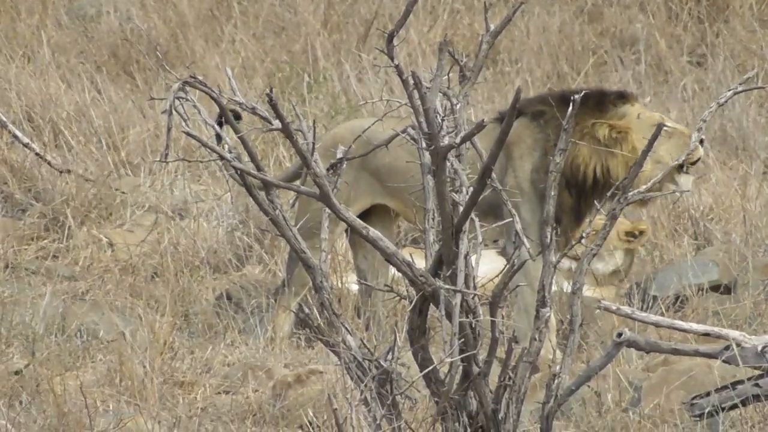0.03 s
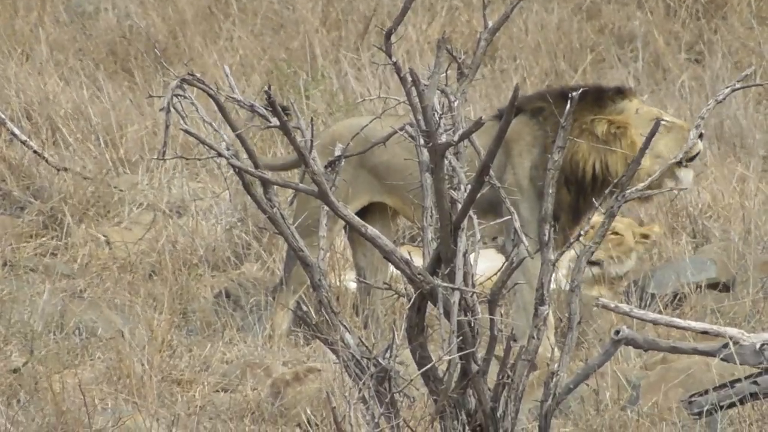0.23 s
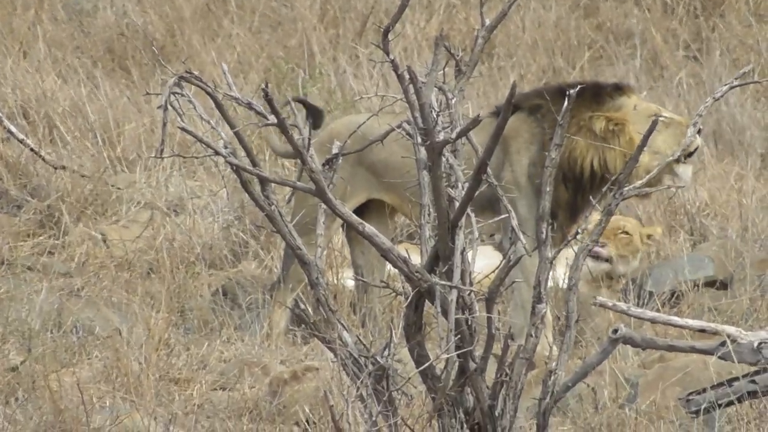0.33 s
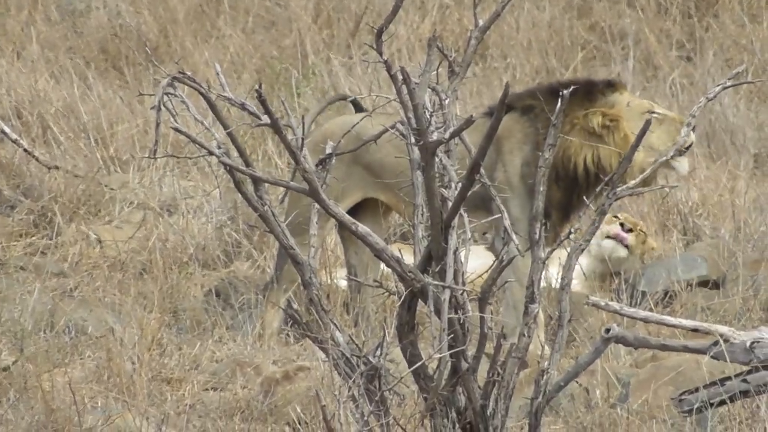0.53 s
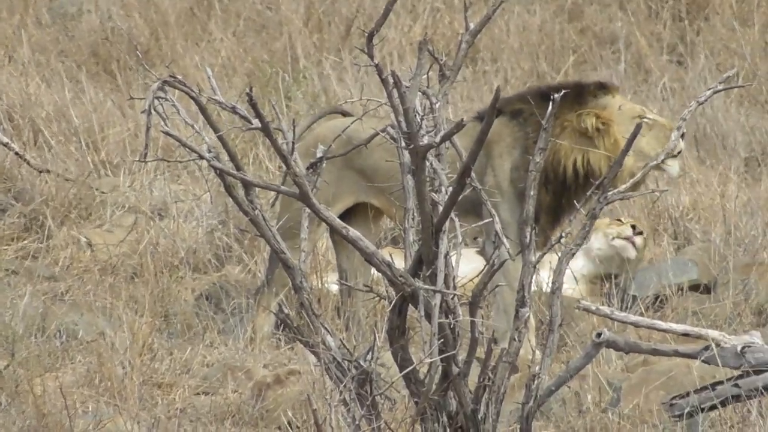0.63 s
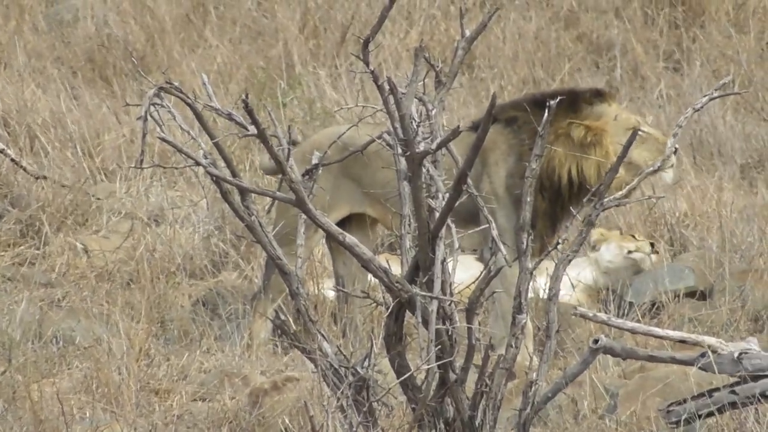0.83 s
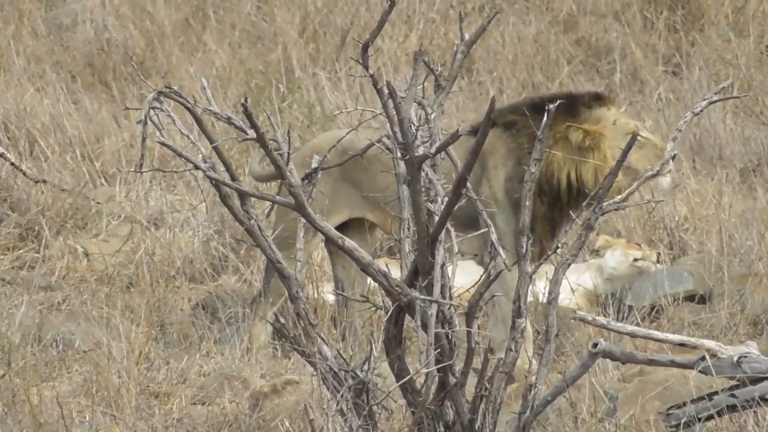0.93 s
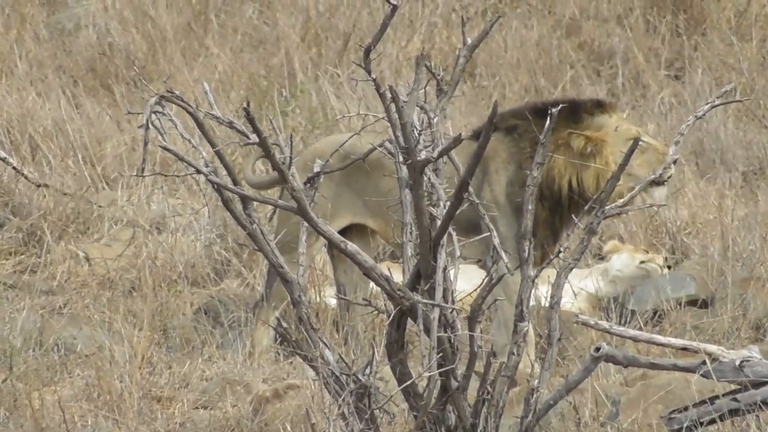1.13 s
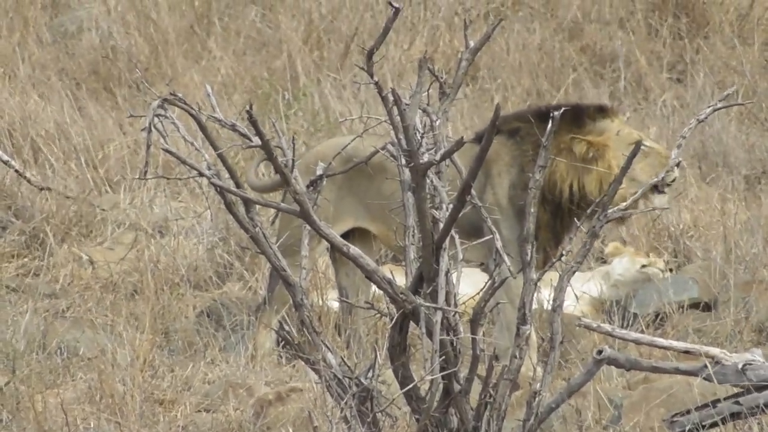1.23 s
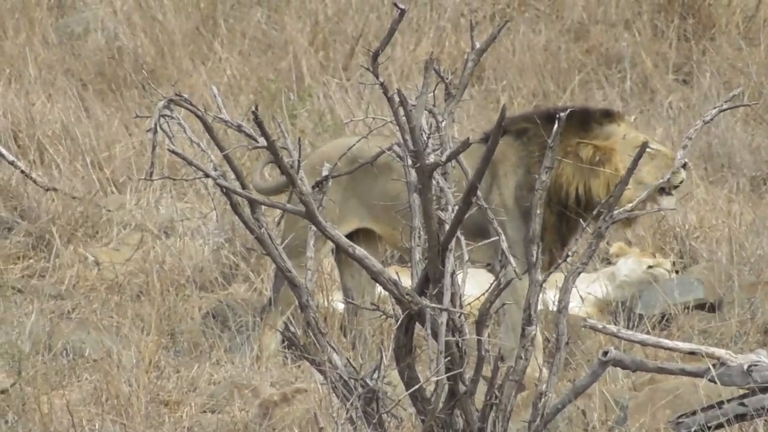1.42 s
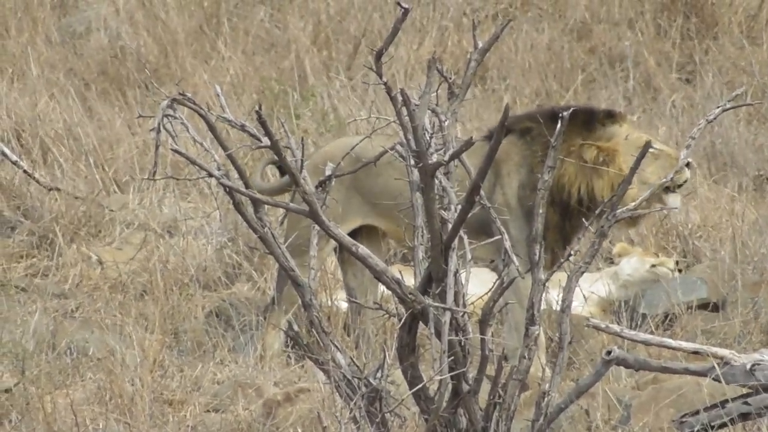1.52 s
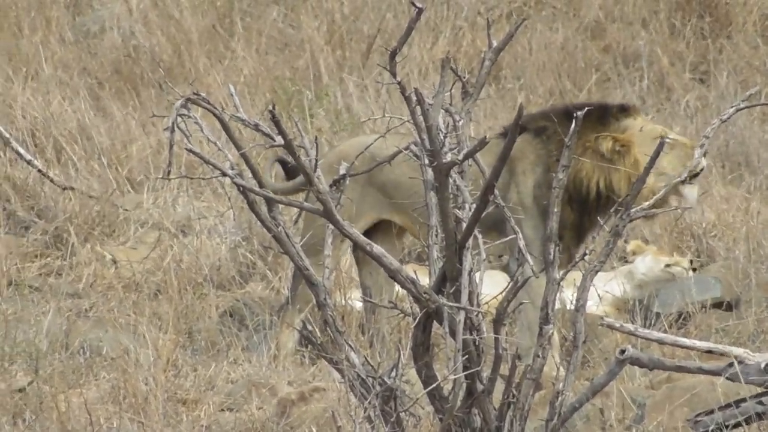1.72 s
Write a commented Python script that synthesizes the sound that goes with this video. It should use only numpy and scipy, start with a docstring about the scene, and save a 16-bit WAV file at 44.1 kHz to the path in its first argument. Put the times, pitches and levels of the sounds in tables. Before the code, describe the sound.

Low lion moan swells and sinks into a puff of air, then a dull thump over light wind.

```python
"""Open dry bush, where a lion gives one soft, drawn-out moan that ends in a puff of air.
A strong low tone rises and sinks in pitch, with faint throat-coloured overtones and pulsing rasp.
The bush returns a weak echo, made by convolving the lion with decaying noise.
Shaped noise gives light wind, low buffets and hiss throughout.
Late on, one dull thump jolts the microphone: push-pull pulses inside a short rush of air."""
import sys
import numpy as np
from scipy import signal
from scipy.fft import rfft, irfft
from scipy.io import wavfile

SR = 44100
rng = np.random.default_rng(int(sys.argv[2]) if len(sys.argv) > 2 else 0)


def digitize_waveform(pressure):
    """Quantize a signal to 16-bit integers and store it at the path in sys.argv[1].

    Rows of a 2-D input are taken as channels; values are limited to [-1, 1].
    """
    field = np.atleast_2d(pressure).T
    bounded = np.clip(field, -1, 1)
    quanta = np.round(bounded * 32767).astype(np.int16)
    wavfile.write(sys.argv[1], SR, quanta)


N = 79380  # 1.8 s


def amp(db):
    """Turns decibels into amplitude gain."""
    return 10 ** (np.asarray(db) / 20)


def clock():
    """Time of every sample [s]."""
    return np.arange(N) / SR


def curve(points):
    """Joins (time [s], value) points by straight lines, holding the end values."""
    return np.interp(clock(), *np.transpose(points))


def level(points):
    """Gain envelope from (time [s], level [dB]) points, at -120 dB outside them."""
    return amp(np.interp(clock(), *np.transpose(points), left=-120, right=-120))


def colour(points, hz):
    """Reads (frequency [Hz], value) points along a log-frequency axis."""
    point_hz, value = np.transpose(points)
    return np.interp(np.log(hz + 1), np.log(point_hz + 1), value)


def unit(x):
    """Scales to an rms of 1 over all channels."""
    return x / np.sqrt(np.mean(x ** 2) + 1e-20)


def pan(db):
    """Left and right gains for a left-over-right level difference [dB]."""
    return amp(np.array([[db], [-db]]) / 2)


def wander(rate_hz):
    """Smooth random drift of rms 1: noise without DC, rolled off above rate_hz."""
    hz = np.fft.rfftfreq(N, 1 / SR)
    rolloff = (hz > 0) / (1 + (hz / rate_hz) ** 4)
    return unit(irfft(rfft(rng.standard_normal(N)) * rolloff, N))


def noise(spectrum, likeness):
    """Coloured stereo noise of rms 1; likeness is left-right correlation, one value or a table over Hz."""
    hz = np.fft.rfftfreq(N, 1 / SR)
    same = np.clip(colour(likeness, hz) if np.ndim(likeness) else likeness, -1, 1)
    mid, side = rfft(rng.standard_normal((2, N))) * amp(colour(spectrum, hz))
    mid = mid * np.sqrt(1 + same)
    side = side * np.sqrt(1 - same)
    return unit(irfft(np.array([mid + side, mid - side]), N))


def swell(at, width):
    """A Gaussian bell peaking at 1, with its time and standard deviation in seconds."""
    return np.exp(-.5 * ((clock() - at) / width) ** 2)


def air():
    """Light wind with a few low buffets, and a high hiss; wind and hiss drift gently in level."""
    # strength of the wind: (time [s], level [dB])
    breeze = [(0, -38), (.3, -40.5), (1.05, -40.5), (1.3, -42.5), (1.58, -43), (1.8, -42)]
    # wind colour: (frequency [Hz], relative level [dB])
    wind_colour = [(10, -20), (26, 0.5), (45, -3), (80, -9.5), (150, -9.5), (300, -14), (600, -16.5),
                   (850, -21), (1300, -30), (1700, -41), (3000, -52.5), (6000, -67)]
    # low buffets: (time [s], bell width [s], level [dB])
    buffets = [(.8, .025, -38), (1.432, .018, -30), (1.725, .03, -39)]
    # buffet colour: (frequency [Hz], relative level [dB])
    buffet_colour = [(15, -1.5), (32, -5.5), (80, -13.5), (170, 1), (300, -33), (900, -66)]
    # hiss colour: (frequency [Hz], relative level [dB])
    hiss_colour = [(500, -3.5), (2000, 3), (2700, -2), (3700, -1), (5000, -9), (6200, -4.5), (7300, 0.5),
                   (8600, 2), (10500, -2.5), (15500, -5.5)]
    # left-right likeness of wind and hiss: (frequency [Hz], correlation [0-1])
    likeness = [(60, 0.75), (900, 0.85), (1900, 0.99), (3800, 1), (6000, 1), (7500, 1), (10000, .4),
                (15000, 0.1)]
    wind_swell_db, hiss_db, hiss_swell_db = 1.5, -57.5, 0.8  # swells are rms

    wind_gain = amp(curve(breeze) + wind_swell_db * wander(rate_hz=7))
    wind = wind_gain * noise(wind_colour, likeness)
    buffet_gain = sum(amp(db) * swell(at, width) for at, width, db in buffets)
    low_buffets = buffet_gain * noise(buffet_colour, 0.83)
    hiss_gain = amp(hiss_db + hiss_swell_db * wander(rate_hz=14))
    hiss = hiss_gain * noise(hiss_colour, likeness)
    return wind + low_buffets + hiss


def moan():
    """The folds give a near-pure low tone, weak overtones shaped by the mouth, and air pulsing each cycle."""
    # pitch of the folds before jitter: (time [s], frequency [Hz])
    pitch = [(.17, 122.3), (.2, 121.3), (.238, 141.6), (.258, 134.3), (.272, 152.1), (.305, 158.4),
             (.35, 172.5), (.42, 176.2), (.495, 171.2), (.525, 158.7), (.63, 145), (.75, 140.6),
             (.78, 130.9), (.815, 134.9), (.84, 127.6), (.92, 128.8)]
    # low tone: (time [s], level [dB])
    loudness = [(.15, -52), (.185, -38.5), (.235, -25), (.258, -34), (.282, -23.5), (.355, -25), (.39, -20),
                (.52, -20), (.58, -15.5), (.755, -17), (.78, -22), (.8, -16.5), (.828, -17.5), (.87, -25.5),
                (.9, -35.5), (.93, -74)]
    # how firmly the folds close, as overtone strength: (time [s], level [dB])
    press = [(.16, -56), (.21, -38.5), (.258, -37.5), (.29, -35.5), (.4, -41), (.5, -41.5), (.57, -36),
             (.7, -36), (.76, -46), (.86, -49.5), (.92, -66.5)]
    # throat resonances on the overtones: (frequency at opening 1 [Hz], relative level [dB])
    throat = [(250, -24.5), (350, -14), (430, -5), (520, -2), (590, 3.5), (650, -2), (740, -12), (860, -14),
              (1000, -23), (1170, -15), (1400, -21), (1650, -49.5)]
    # mouth opening: (time [s], factor on the throat's resonance frequencies)
    mouth_opening = [(.17, 0.61), (.24, 0.78), (.29, 0.97), (.42, 1), (.52, 1.02), (.66, 0.98),
                     (.72, 1.125), (.76, 1.1), (.86, 1.18)]
    # air through the throat: (time [s], level [dB])
    airflow = [(.13, -51), (.2, -47.5), (.28, -46.5), (.4, -44.5), (.6, -46.5), (.73, -39), (.85, -45),
               (.93, -47), (1.0, -80)]
    # rasp colour: (frequency [Hz], relative level [dB])
    rasp_colour = [(100, -12), (200, 9), (300, -7.5), (450, -1), (600, 8), (780, -4), (980, -12),
                   (1350, -7.5), (1600, -27.5), (2250, -23.5), (2700, -46.5), (3600, -45.5), (5000, -53)]
    jitter, shimmer, flutter = .008, .04, .14  # rms fractions of pitch, tone and each overtone
    jitter_hz = 70  # drift rate of jitter and shimmer
    rasp_pulsing, rasp_likeness = 0.57, 0.77  # depth per cycle; left-right correlation

    hz, mouth = curve(pitch), curve(mouth_opening)
    unsteady_hz = hz * (1 + jitter * wander(jitter_hz))
    phase = 2 * np.pi * np.cumsum(unsteady_hz) / SR
    tone = level(loudness) * (1 + shimmer * wander(jitter_hz)) * np.cos(phase)
    overtones = 0
    for k in range(2, 13):
        # a wider mouth moves the resonances up
        strength = amp(colour(throat, k * hz / mouth)) * (1 + flutter * wander(rate_hz=19))
        overtones += strength * np.cos(k * phase + 2 * np.pi * rng.random())
    pulsed_air = noise(rasp_colour, rasp_likeness) * (1 + rasp_pulsing * np.cos(phase))
    rasp = level(airflow) * unit(pulsed_air)
    return tone + level(press) * overtones + rasp


def placed(x):
    """The voice reaches the right microphone port slightly later and louder than the left."""
    lag_s, pan_db = 0.00011, -1.5
    late_right = np.interp(clock() - lag_s, clock(), x[1])
    return np.array([x[0], late_right]) * pan(pan_db)


def puff():
    """Air hisses from the lion's open mouth as centred noise, most strongly as the voice falls away."""
    # air from the opening mouth, with a last puff: (time [s], level [dB])
    mouth_air = [(.58, -74.5), (.72, -55.5), (.8, -61), (.838, -48.5), (.87, -56.5), (.93, -61.5),
                 (1.05, -75)]
    # puff colour: (frequency [Hz], relative level [dB])
    puff_colour = [(300, -13), (900, 14), (1450, 3.5), (1750, -3), (2200, 3.5), (2800, -11.5), (3600, 2.5),
                   (4200, -3.5), (5000, -9), (8000, -8), (14000, -25.5)]
    return level(mouth_air) * noise(puff_colour, likeness=1.0)


def bush(x):
    """Trees and ground scatter back a thin echo: convolution with coloured noise that decays."""
    # colour of the scattering: (frequency [Hz], gain [dB])
    scatter_colour = [(60, 6), (180, 5.5), (400, 7), (1500, 15), (3000, 9), (8000, -3)]
    delay_s, t60_s = .03, 1.6
    echo_db = -22.5  # ahead of the scattering's own colour
    t = clock()
    scatter = noise([(20, 0), (20000, 0)], likeness=.4)  # flat spectrum
    decaying = scatter * (t > delay_s) * amp(-60 * t / t60_s)
    tail = unit(decaying) / np.sqrt(N)  # unit energy per channel on average
    tail = irfft(rfft(tail) * amp(colour(scatter_colour, np.fft.rfftfreq(N, 1 / SR))), N)
    return amp(echo_db) * signal.fftconvolve(x, tail, axes=1)[:, :N]


def thump():
    """A few soft push-pull jolts at the microphone, with no ring, inside a short rush of air."""
    # jolts: (time [s], level [dB], half-length of the central pull [s], left-over-right level difference [dB])
    jolts = [(1.4297, -16, 0.0016, 3), (1.4425, -18.5, 0.001, 14), (1.461, -32, .0028, -8)]
    # colour of the rush: (frequency [Hz], relative level [dB])
    rush_colour = [(30, -13), (200, -6.5), (350, -0.5), (520, -10), (800, -20), (1350, -25), (1700, -53),
                   (4000, -70)]
    rush_s, rise_s, fall_s = 1.4335, .0025, .0075  # peak time; exponential time constants
    rush_db, rush_pan_db, rush_likeness = -20.5, 2, -0.13

    out = np.zeros((2, N))
    for at, db, width, pan_db in jolts:
        push_pull = swell(at, width) * (((clock() - at) / width) ** 2 - 1)
        out += amp(db) * pan(pan_db) * push_pull
    t = clock() - rush_s
    envelope = np.exp(np.minimum(t / rise_s, -t / fall_s))
    rush = envelope * noise(rush_colour, rush_likeness)
    return out + amp(rush_db) * pan(rush_pan_db) * rush


def scene():
    """The open air, the lion and its echo, and the thump."""
    lion = placed(moan()) + puff()
    return air() + lion + bush(lion) + thump()


def record(dry):
    """The recorder's band limit: a steep linear-phase low-pass."""
    edge_hz = 15750
    lowpass = signal.firwin(511, edge_hz, window=("kaiser", 9), fs=SR)
    return signal.oaconvolve(dry, lowpass[None], "same")


dry = scene()
out = record(dry)
digitize_waveform(out)
```